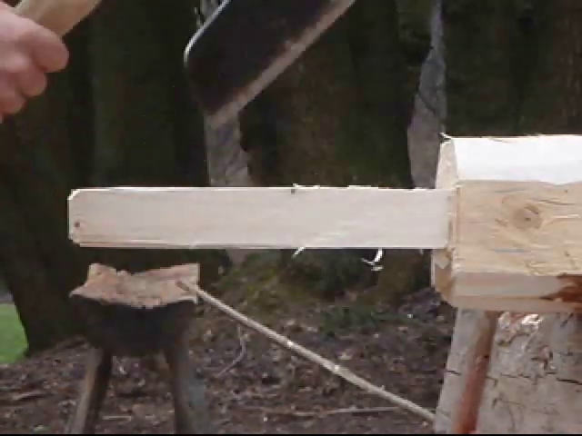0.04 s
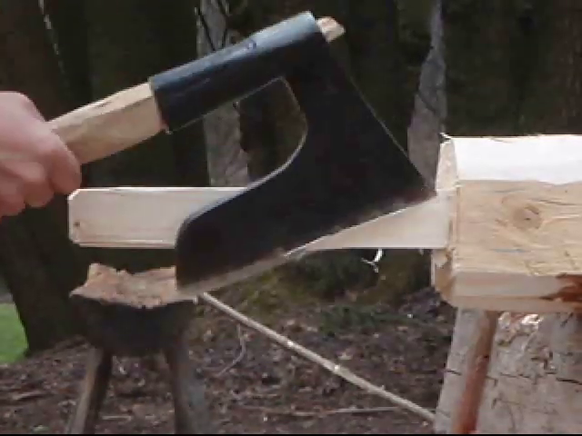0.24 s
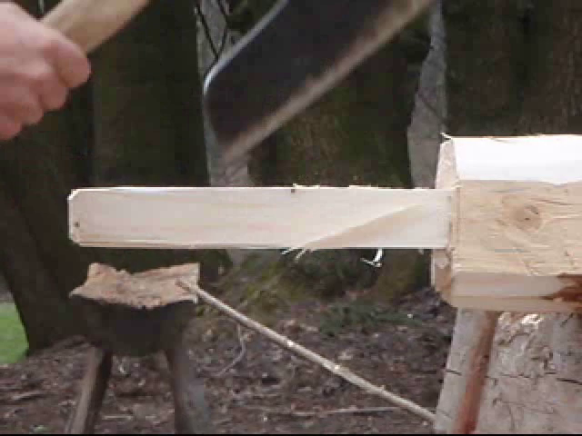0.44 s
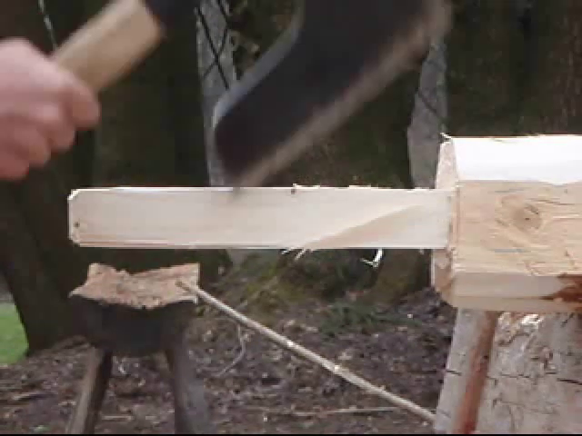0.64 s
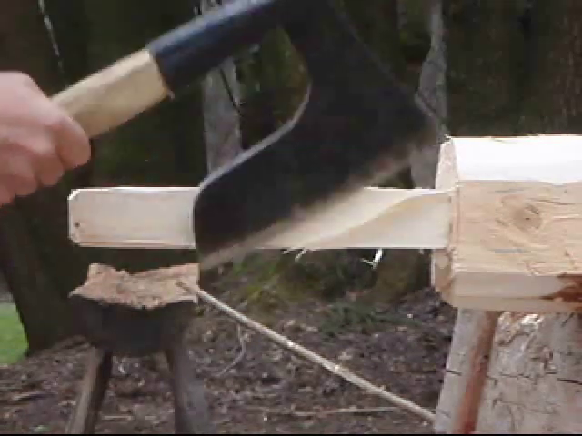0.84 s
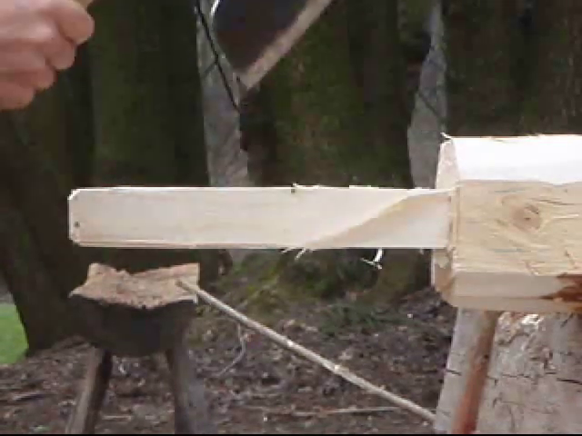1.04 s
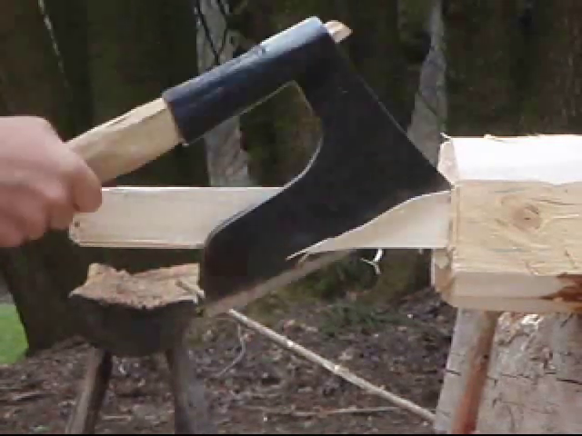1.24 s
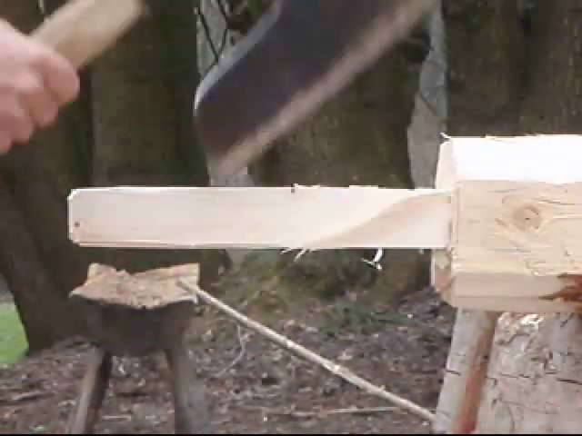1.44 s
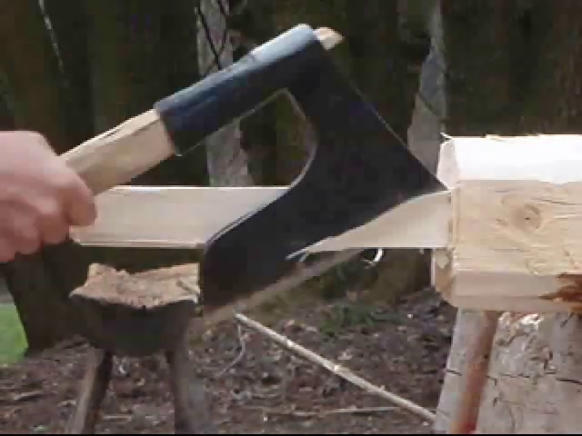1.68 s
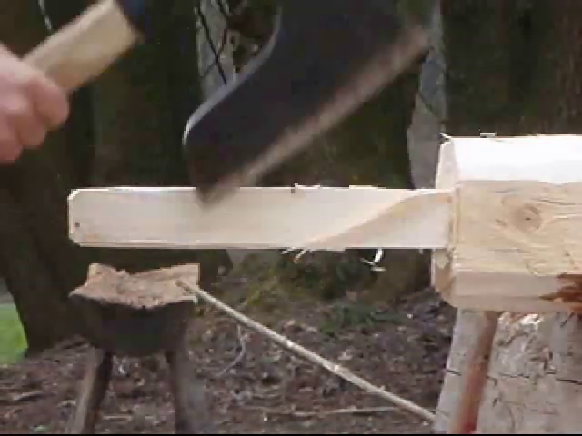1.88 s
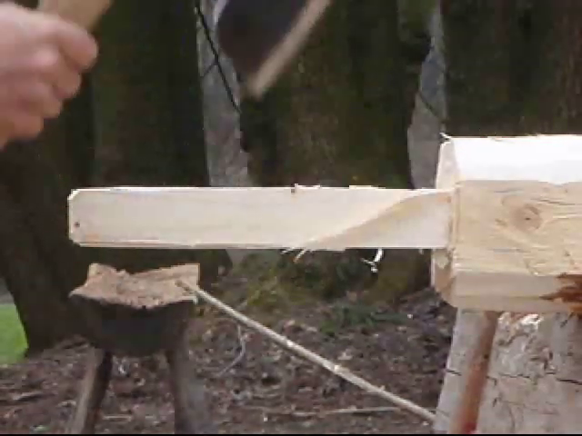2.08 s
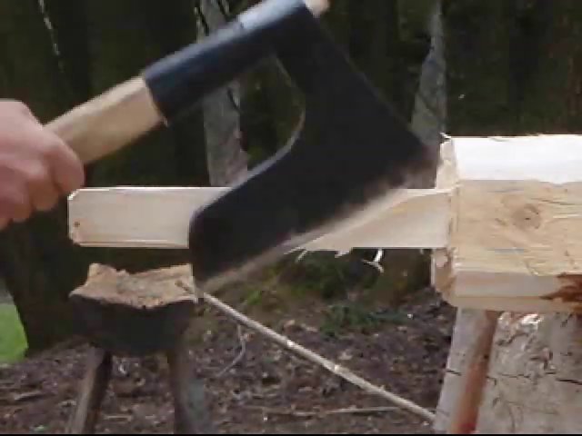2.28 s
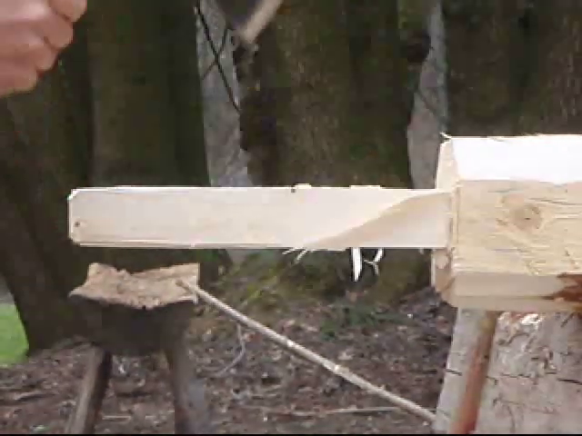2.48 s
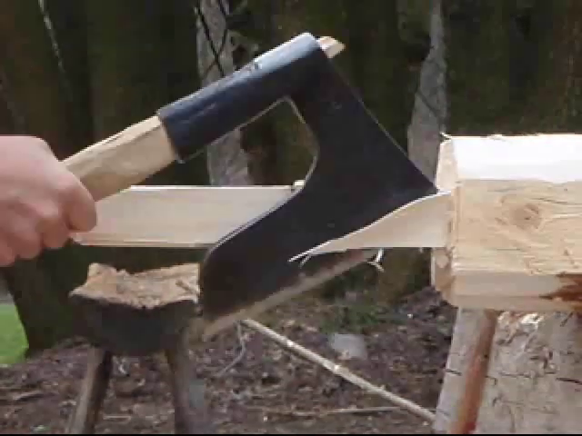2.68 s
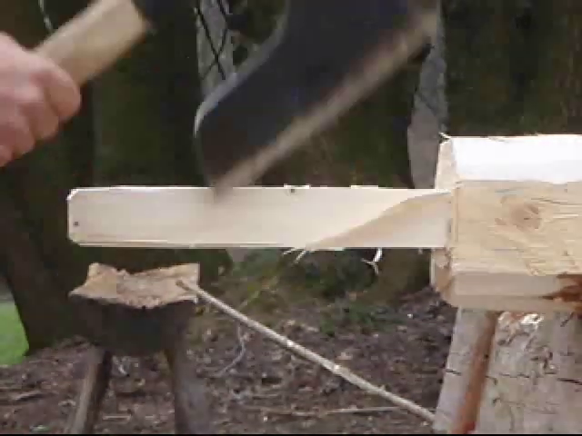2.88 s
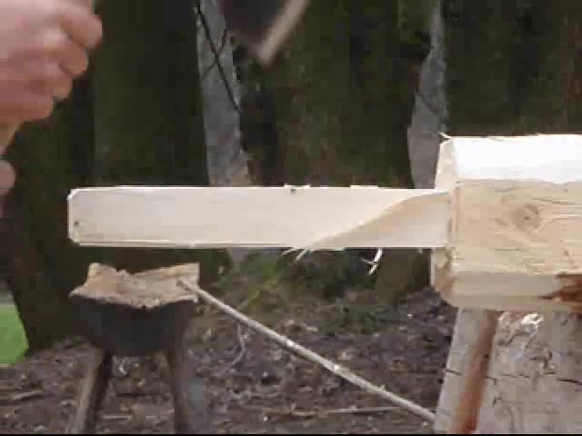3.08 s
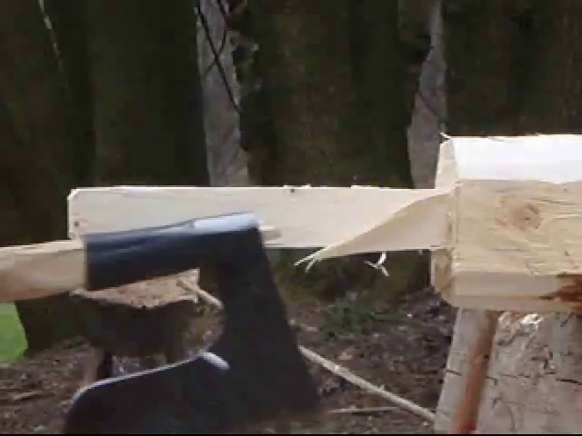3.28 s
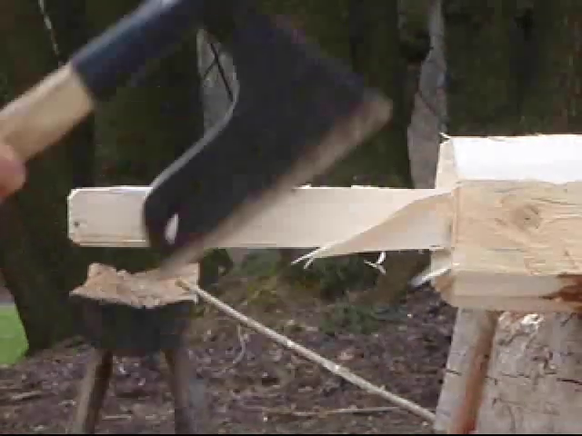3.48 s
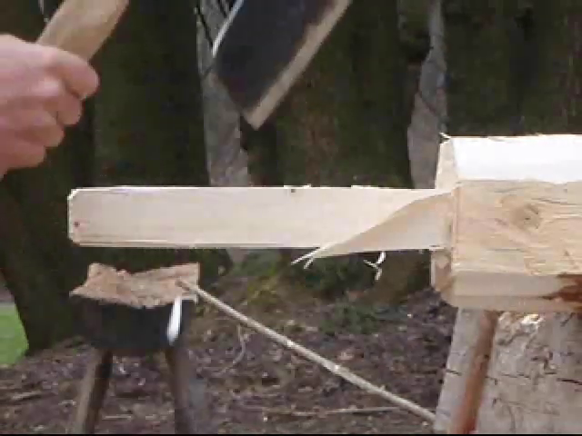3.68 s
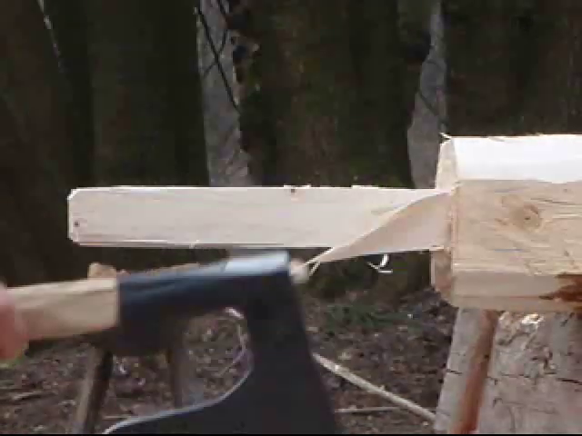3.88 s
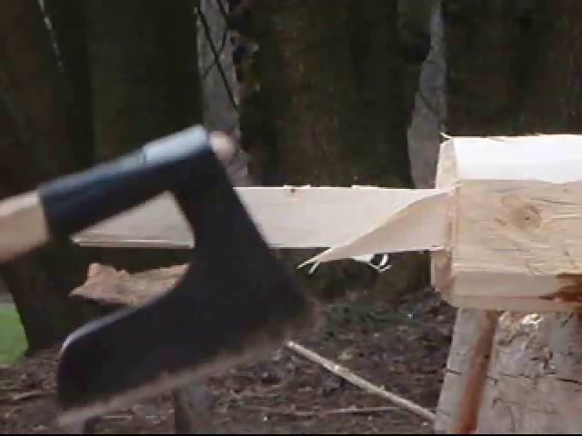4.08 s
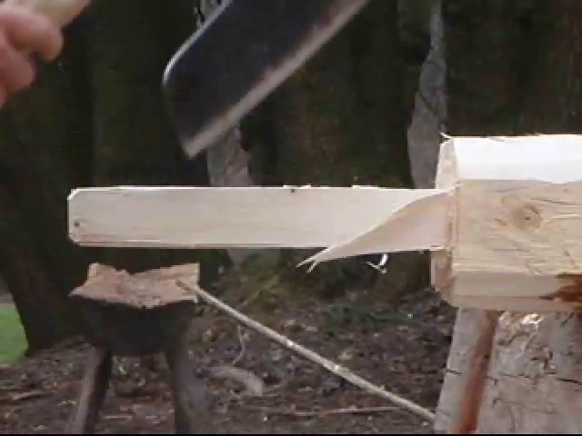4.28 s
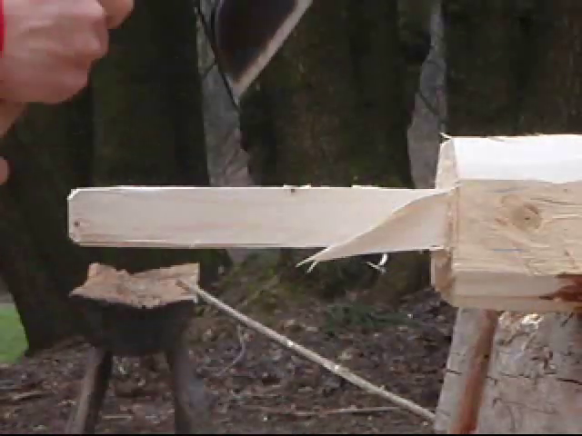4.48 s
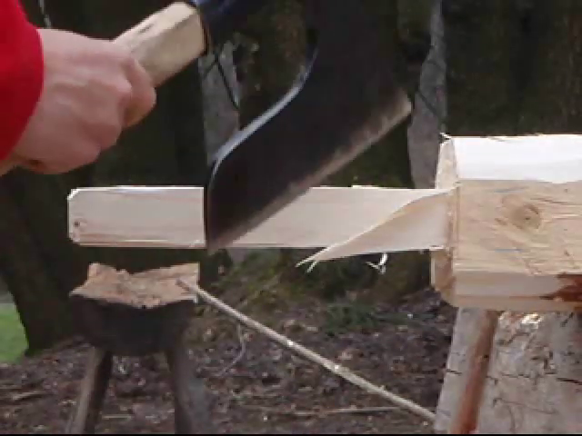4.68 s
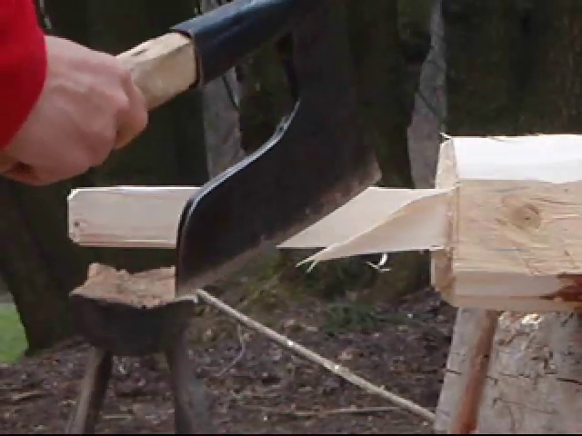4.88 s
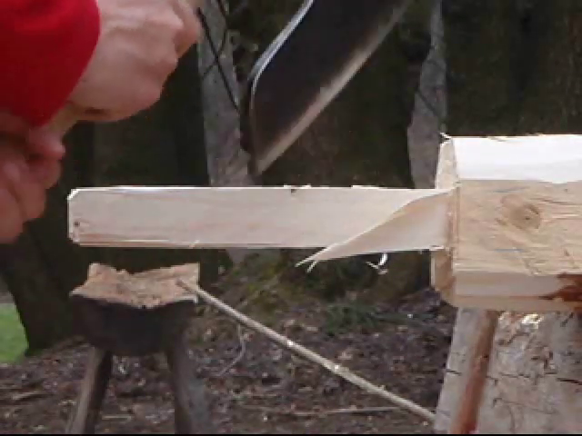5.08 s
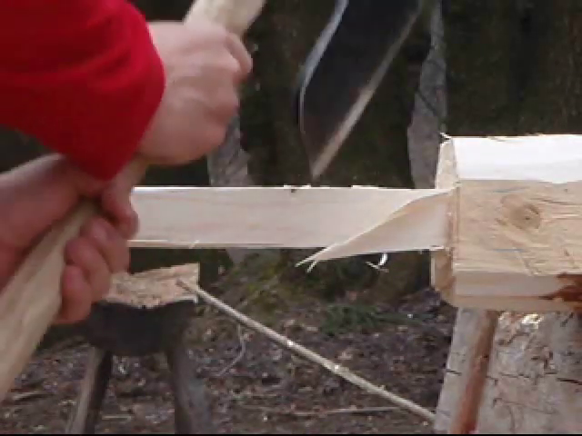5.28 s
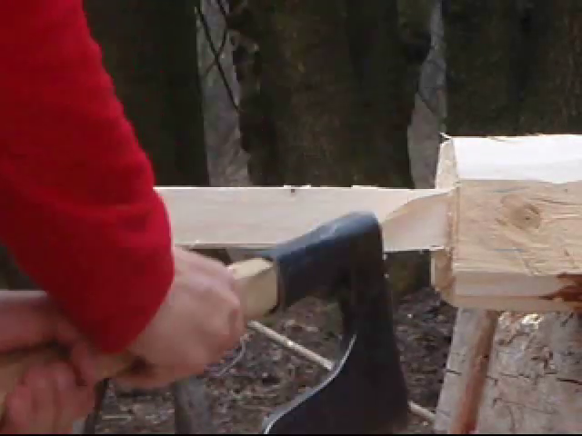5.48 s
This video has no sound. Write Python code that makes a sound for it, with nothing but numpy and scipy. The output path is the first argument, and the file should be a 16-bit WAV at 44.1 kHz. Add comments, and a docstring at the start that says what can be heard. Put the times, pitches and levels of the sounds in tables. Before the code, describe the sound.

Broad axe chops crack into a timber beam about every half second, the woody knocks ringing briefly, then ticks and leafy shuffling in a quiet wood.

```python
"""You first hear a broad axe chopping a timber beam in a wood, a couple of metres from a small camera.
Each chop mixes short tones and noise for the crack and tearing fibres, fading tones for the ringing beam,
and a low thump for the ground. The steel sings as a sine when it swings free. Around it, chips tick as noise
bursts, leaves rustle underfoot as gritty noise, a bird whistles gliding tones, and the woods hiss softly.
The camera samples 8000 times a second and holds each value, which mirrors the sound upward."""
import sys
import numpy as np
from scipy import signal
from scipy.fft import rfft, irfft
from scipy.io import wavfile
from scipy.ndimage import uniform_filter1d

SR = 44100
rng = np.random.default_rng(int(sys.argv[2]) if len(sys.argv) > 2 else 0)


def log_audio(samples):
    """Write samples as a 16-bit WAV file to the path given in sys.argv[1]."""
    # one column per channel
    frames = np.atleast_2d(samples).T
    # limit to full scale, then quantise
    limited = np.clip(frames, -1, 1)
    pcm = np.round(limited * 32767).astype(np.int16)
    wavfile.write(sys.argv[1], SR, pcm)


N = 244314  # samples in the scene

# Levels in the tables are starting levels: the functions add their own boosts and fades.
# Axe chops: (t/s, entry/ms, crack level/dB, main cheek f/Hz, second cheek f/Hz, crack fade/ms,
#   knock level/dB, knock f/Hz, tearing level/dB, tearing time/ms, beam level/dB, loudest beam f/Hz,
#   upper modes level/dB, push/ms, ring stretch/factor, rebound level/dB, ground level/dB)
CHOPS = [(0.219, 1.7, -20.5, 2490, 1893, 45, -16, 395, -21, 20.5, -14, 547, -3, 9.5, 0.78, -44, -59),
         (0.7247, 1.3, -14.5, 2700, 1967, 20, -17.5, 680, -21.5, 14.3, -22.5, 666, 0, 9.3, 0.98, -42, -56),
         (1.2333, 1.6, -22, 2240, 2720, 19, -24, 607, -23, 16, -18.5, 560, -10, 6, 1.02, -37.5, -46.5),
         (1.7302, 2.75, -12.5, 2260, 2680, 13, -10, 1270, -25.5, 19, -17, 710, -7, 13.7, 1.19, -37.5, -53),
         (2.2341, 1.65, -7, 2180, 2830, 11.3, -39, 910, -17, 9.8, -16, 665, -6, 11, 1.22, -37.5, -49),
         (2.7301, 4.5, -10, 2120, 2570, 10.4, -6.5, 668, -22.5, 19, -17.5, 690, -3, 3.8, 1, -33, -49.5),
         (3.238, 1.44, -7, 2513, 1490, 16.2, -9.5, 1260, -18, 17.8, -28.5, 474, 0, 2.9, 1.82, -60, -56),
         (3.8527, 1.4, -27, 1997, 2444, 64, -17.5, 358, -22.5, 31, -17, 373, 3, 16.5, 0.86, -47, -53)]
# Free swings of the blade, until it touches wood again: (t/s, length/s, level/dB)
FREE_SWINGS = [(3.289, .55, -39), (3.872, .6, -44.5), (5.467, .1, -40)]
REBOUND_S = 0.036  # wait after the chop
REBOUND_HZ, REBOUND_T60_S, REBOUND_WIDTH = 2240, 0.14, 0.36  # width as a share of the pitch


def axe():
    """Each chop gives a sharp part (crack, tearing, rebound) and a ringing part (beam, ground, steel)."""
    sharp, ringing, t = np.zeros(N), np.zeros(N), np.arange(SR) / SR
    for (s, entry_ms, crack_db, crack_hz, second_hz, crack_ms, knock_db, knock_hz, tear_db, tear_ms,
         beam_db, region_hz, upper_db, push_ms, stretch, rebound_db, ground_db) in CHOPS:
        bite = crack(t, crack_db, crack_hz, second_hz, crack_ms / 1000)
        bite = bite + undb(knock_db + 5.5) * knock(t, knock_hz, 9.2 / knock_hz, 3.15 / knock_hz)
        add(sharp, s - 0.001, bite)
        # fibres tear from the moment the edge enters, a little ahead of the crack
        add(sharp, s - entry_ms / 1000, tearing(t, tear_db, entry_ms, tear_ms))
        # the blade settles in the cut
        rebound = tick(t, rebound_db, REBOUND_HZ, REBOUND_T60_S, REBOUND_WIDTH)
        add(sharp, s + REBOUND_S, rebound)
        ring = beam(t, beam_db, region_hz, upper_db, push_ms, stretch)
        add(ringing, s, ring + ground(t, ground_db))
    for s, length, db in FREE_SWINGS:
        add(ringing, s, steel(t[t < length], db))
    return sharp, ringing


# Tone colour of the broad snap in each crack: (f/Hz, level/dB)
CRACK_COLOUR = [(120, -12), (250, 4), (500, 4.5), (1000, -4.5), (1500, -7.5), (3000, -15), (3900, -13)]


def crack(t, db, main_hz, second_hz, t60):
    """The biting edge shakes the blade cheeks for a few cycles, over a broad snap of noise."""
    main = np.sin(2 * np.pi * main_hz * t)
    second = 0.63 * np.sin(2 * np.pi * (second_hz * t + rng.random()))
    snap = 0.38 * colour(rng.standard_normal(SR), CRACK_COLOUR)
    shape = fade(t, t60) * (1 - fade(t, 0.93 * t60))
    return undb(db + 8.5) * (main + second + snap) * shape


def knock(t, hz, t60, rise_t60):
    """A dull blow: one low tone that rises quickly and dies at once."""
    return np.sin(2 * np.pi * hz * t) * fade(t, t60) * (1 - fade(t, rise_t60))


# Tone colour of tearing fibres: (f/Hz, level/dB)
TEAR_COLOUR = [(150, -29), (300, -26), (600, 1.5), (1300, 0.5), (2400, 4), (3200, 3), (3900, -7.5)]
TEAR_SPREAD_DB = 3
SUDDEN = 2  # how abruptly the tearing stops


def tearing(t, db, entry_ms, tear_ms):
    """Fibres snap unevenly while the edge slides in, until it stops."""
    t_ms = 1000 * t
    sliding = np.minimum(t_ms / entry_ms, 1) * np.exp(-(t_ms / tear_ms) ** SUDDEN)
    return undb(db) * sliding * colour(grit(SR, TEAR_SPREAD_DB), TEAR_COLOUR)


# Natural tones (modes) of the beam: (f/Hz, level/dB, time to fade by 60 dB/s, before the chop's stretch)
BEAM_MODES = [(165, -12, .16), (215, -10, .15), (255, -9, .15), (301, -7, .24), (373, 0, .27),
              (476, -1, .23), (508, -1, .2), (551, -4, .2), (608, 0, .22), (686, -3, .26), (733, -10, .18),
              (860, -5, .09), (1082, -1, .2), (1136, -3, .18), (1342, -2, .11), (1480, -3, .11),
              (1927, -4, .11), (2172, -3, .12)]
# Tone colour of the rattle in the beam: (f/Hz, level/dB)
RATTLE_COLOUR = [(100, -8), (180, 2), (400, 14), (800, -1), (1400, -0.5), (2400, -9.5), (3900, -44)]
RATTLE_DB, RATTLE_T60_S = -7, 0.25  # level against the beam level; fade before the stretch
REGION_DB_PER_OCTAVE = 9  # modes get weaker away from the loudest region
UPPER_HZ = 800  # modes above this follow the chop's upper level


def beam(t, db, region_hz, upper_db, push_ms, stretch):
    """The beam takes the force over the length of the push, so its modes swell before they fade."""
    swell = 1 - np.exp(-1000 * t / push_ms)
    rattle = colour(grit(SR, 6.6), RATTLE_COLOUR)
    total = undb(RATTLE_DB) * rattle * fade(t, RATTLE_T60_S * stretch)
    chances = rng.standard_normal((len(BEAM_MODES), 3))
    for (hz, mode_db, t60), (turn, drift, size) in zip(BEAM_MODES, chances):
        # the timber shifts on its trestle and grips the blade, so no mode rings cleanly
        wave = np.exp(2j * np.pi * (hz * (1 + 0.0083 * drift) * t + turn))
        ring = (unsteady(SR, 38.3, 0.68) * wave).imag
        octaves_away = abs(np.log2(hz / region_hz))
        level_db = mode_db - REGION_DB_PER_OCTAVE * octaves_away
        level_db = level_db + upper_db * (hz > UPPER_HZ) + 1.05 * size
        total = total + undb(level_db) * fade(t, stretch * t60) * ring
    return undb(db) * swell * total


GROUND_HZ, GROUND_LAG_S, GROUND_T60_S = 56.3, 0.054, 1


def ground(t, db):
    """The ground thumps a moment later: noise through two low resonances."""
    late = t - GROUND_LAG_S
    thump = band(band(rng.standard_normal(SR), GROUND_HZ, 45), GROUND_HZ, 45)
    return undb(db) * thump / np.std(thump) * fade(late, GROUND_T60_S) * (1 - fade(late, 0.093))


STEEL_HZ, STEEL_RISE_S, STEEL_T60_S = 2433, 0.06, 1.0


def steel(t, db):
    """The blade sings one pure tone once it has left the wood."""
    tone = np.sin(2 * np.pi * STEEL_HZ * t)
    return undb(db) * tone * (1 - fade(t, STEEL_RISE_S)) * fade(t, STEEL_T60_S)


# Ticks of chips, twigs and glancing blows: (t/s, level/dB, f/Hz, width/share of f, 60 dB fade/s)
TICKS = [(1.237, -26, 1500, 1.1, .018), (2.82, -34, 1130, .35, 0.075), (3.258, -16, 3300, .6, 0.016),
         (3.288, -34, 2700, .45, .016), (3.469, -25.5, 2900, 0.25, 0.022), (3.482, -38, 2960, .27, 0.082),
         (3.496, -40.5, 2900, .25, 0.056), (3.861, -32, 2050, 0.66, 0.01), (3.881, -29, 2780, 0.76, 0.014),
         (3.918, -35, 2900, .4, .021), (4.394, -39, 2490, 0.66, 0.027), (4.478, -36, 2600, .8, 0.03),
         (4.575, -20.5, 1400, 2.6, .016), (4.911, -38, 2800, .55, .02), (4.988, -37, 2010, 0.8, .025),
         (5.04, -35, 1180, 1.2, 0.039), (5.085, -40, 2600, 0.65, .03), (5.145, -37, 2780, .65, 0.032),
         (5.166, -31, 1790, 0.89, 0.02), (5.255, -33.5, 2760, 0.62, 0.026), (5.335, -29, 1950, 1.1, 0.032),
         (5.366, -39, 2300, .65, 0.047), (5.467, -18.5, 1800, 3.3, 0.023), (5.477, -21.5, 2320, 2.2, 0.026)]
# Dull knocks around the work: (t/s, level/dB, f/Hz)
KNOCKS = [(.229, -16, 560), (3.878, -20.5, 478), (3.888, -22.5, 483), (4.408, -32.5, 247),
          (4.575, -38, 724), (4.834, -33.5, 400), (4.952, -38.5, 253), (5.195, -45, 480), (5.468, -43, 776)]


def chips():
    """Short noisy ticks and dull knocks around the work."""
    out, t = np.zeros(N), np.arange(SR // 2) / SR
    for s, db, hz, width, t60 in TICKS:
        add(out, s - 0.001, tick(t, db, hz, t60, width))
    for s, db, hz in KNOCKS:
        add(out, s, undb(db + 7.0) * knock(t, hz, 0.037, 0.0098))
    return out


# Shuffles in the leaves: (loudest t/s, level/dB, 60 dB fade/s)
SHUFFLES = [(4.4, -46, 0.91), (4.48, -44, 1), (4.935, -38.5, 0.51), (5.06, -45.5, 1), (5.245, -40, 0.19),
            (5.334, -38.5, 0.29)]
# Tone colour of the leaves: (f/Hz, level/dB)
LEAF_COLOUR = [(200, 5), (500, 14.5), (1200, 14), (2200, 14.5), (3300, 10), (3900, -5)]
SHUFFLE_RISE_T60_S = 0.2


def leaves():
    """Leaves underfoot crunch densely, swelling to each shuffle and dying away."""
    t, power = np.arange(N) / SR, np.zeros(N)
    for s, db, t60 in SHUFFLES:
        swell = np.where(t < s, fade(s - t, SHUFFLE_RISE_T60_S), fade(t - s, t60))
        power += (undb(db) * swell) ** 2
    return np.sqrt(power) * colour(grit(N, 3.0), LEAF_COLOUR)


# Bird whistles: (start t/s, top t/s, end t/s, top f/Hz before smoothing, level/dB)
WHISTLES = [(.14, .225, .375, 2960, -44.5), (1.772, 1.832, 2.05, 3030, -46), (2.47, 2.575, 2.78, 3100, -45),
            (3.29, 3.375, 3.54, 3090, -49)]
BIRD_LOW_HZ, SAG_HZ_PER_S, DROP_S = 2460, 1600, 0.045
START_DB, SAG_DB, BEND_DB, END_DB = -8, -8, -5, -12  # against the middle of the climb


def bird():
    """Arched, nearly pure whistles: the pitch climbs, sags slowly and drops quickly."""
    out = np.zeros(N)
    for start, top, end, top_hz, db in WHISTLES:
        t, bend = np.arange(start, end, 1 / SR), end - DROP_S
        bend_hz = top_hz - SAG_HZ_PER_S * (bend - top)
        hz = np.interp(t, [start, top, bend, end], [BIRD_LOW_HZ, top_hz, bend_hz, BIRD_LOW_HZ])
        hz = uniform_filter1d(hz, size=SR // 40)  # round off the corners
        level_times = [start, (start + top) / 2, (top + bend) / 2, bend, end]
        level_db = db + np.interp(t, level_times, [START_DB, 0, SAG_DB, BEND_DB, END_DB])
        ends = np.clip(np.minimum(t - start, end - t) / 0.0046, 0, 1)
        # the call comes from far off through the branches and wavers
        wave = np.exp(2j * np.pi * np.cumsum(hz) / SR)
        tone = (unsteady(len(t), 90, 0.45) * wave).imag
        add(out, start, np.sqrt(2) * undb(level_db) * ends * tone)
    return out


TREES_DB, TREES_T60_S = -51, 0.41


def trees(x):
    """Many trunks scatter the sound: a fading cloud of random echoes."""
    t = np.arange(SR // 2) / SR
    echoes = undb(TREES_DB) * fade(t - 0.008, TREES_T60_S) * rng.standard_normal(len(t))
    return signal.fftconvolve(x, echoes)[:N]


# Tone colour of the steady woods: (f/Hz, level per Hz/dB)
WOODS_COLOUR = [(15, -44), (25, -13), (80, -14), (252, -2.5), (298, -2), (401, -2.5), (600, -4.5),
                (667, -6), (841, -5), (1060, -8), (1210, -7), (1490, -9), (3950, -15.5), (5140, -62),
                (8690, -120)]
WOODS_DB = -44.5


def woods():
    """The steady background of the wood: coloured noise."""
    return undb(WOODS_DB) * colour(rng.standard_normal(N), WOODS_COLOUR)


def undb(db):
    """Turn a level in dB into a gain."""
    return 10 ** (np.asarray(db) / 20)


def fade(t, t60):
    """Decay by 60 dB in t60 s (at least 1 ms), silent before t = 0."""
    return (t >= 0) * np.exp(-np.log(1000) * np.maximum(t, 0) / max(t60, 1e-3))


def colour(x, points):
    """Shape a sound's spectrum with (f/Hz, level/dB) points, then bring its strength (rms) to 1."""
    hz, db = np.transpose(points)
    f = np.maximum(np.fft.rfftfreq(len(x), 1 / SR), 1)
    gain = undb(np.interp(np.log(f), np.log(hz), db))
    y = irfft(rfft(x) * gain, len(x))
    return y / np.std(y)


def band(x, hz, width_hz):
    """Pass a sound through a resonance with gain 1 at its centre."""
    sharpness = max(hz / width_hz, 0.3)
    return signal.lfilter(*signal.iirpeak(min(hz, SR / 3), sharpness, fs=SR), x)


def grit(count, spread_db):
    """Noise in runs of 16 samples with very uneven sizes, like snapping fibres."""
    sizes = np.minimum(rng.exponential(size=count // 16 + 1), 3)
    sizes = np.repeat(sizes, 16)[:count]
    return rng.standard_normal(count) * undb(spread_db * sizes)


def unsteady(count, rate_hz, depth):
    """Complex gain that wanders in size and phase about 1, with rate_hz up to 100."""
    knots = rng.standard_normal((2, int(count * 100 / SR) + 2))
    knot_places = np.arange(knots.shape[1])
    place = np.minimum(np.arange(count) * rate_hz / SR, knots.shape[1] - 1)
    re, im = (np.interp(place, knot_places, k) for k in knots)
    return (1 + depth * (re + 1j * im)) / np.sqrt(1 + depth ** 2)


def tick(t, db, hz, t60, width):
    """A short burst of noise in one broad resonance; width as a share of the pitch."""
    x = band(band(rng.standard_normal(len(t)), hz, width * hz), hz, 2 * width * hz)
    return undb(db + 2.5) * x / np.std(x) * fade(t, t60) * (1 - fade(t, 0.0093))


def add(out, s, sound):
    """Mix a sound in from time s on."""
    i = int(s * SR)
    out[i:i + len(sound)] += sound[:N - i]


SMALL_LOW_HZ = 171


def scene():
    """Everything at the microphone; small cracking things send out little bass."""
    sharp, ringing = axe()
    less_bass = signal.butter(2, SMALL_LOW_HZ, "high", fs=SR, output="sos")
    small = signal.sosfilt(less_bass, sharp + trees(sharp) + chips())
    return (small + ringing + leaves() + bird() + woods())[None]


HOLD_HZ, INPUT_TOP_HZ, OFFSET = 8000, 3820, -0.0039
LIFT_HZ, LIFT_DB, TOP_HZ = 13800, -10, 15550  # LIFT_DB: level of the added treble band


def record(dry):
    """The camera filters the input, holds slow samples in steps, lifts and cuts treble, adds an offset."""
    input_filter = signal.ellip(5, 0.5, 50, INPUT_TOP_HZ, fs=SR, output="sos")
    heard = signal.sosfilt(input_filter, dry[0])
    held = np.floor(np.arange(N) * HOLD_HZ / SR) * SR / HOLD_HZ  # place of the latest slow sample
    steps = np.interp(held, np.arange(N), heard)
    lifted = steps + undb(LIFT_DB) * band(steps, LIFT_HZ, 2800)
    final_cut = signal.cheby1(14, 0.5, TOP_HZ, fs=SR, output="sos")
    return signal.sosfilt(final_cut, lifted)[None] + OFFSET


dry = scene()
out = record(dry)
log_audio(out)
```